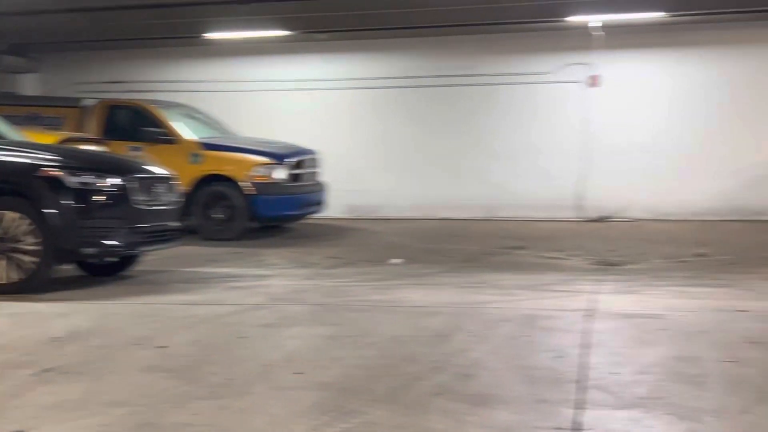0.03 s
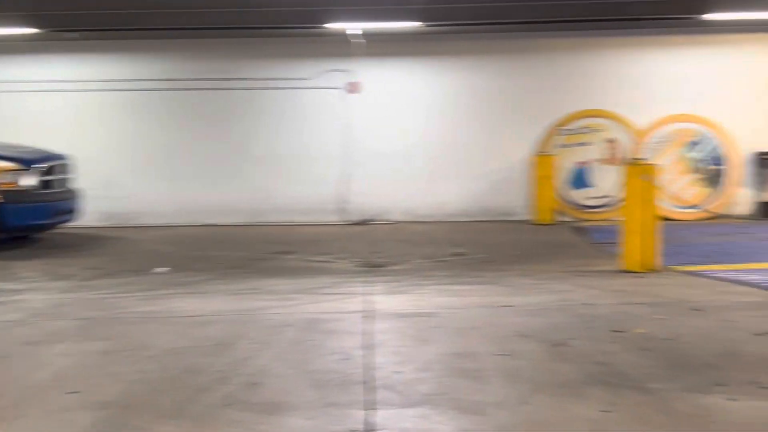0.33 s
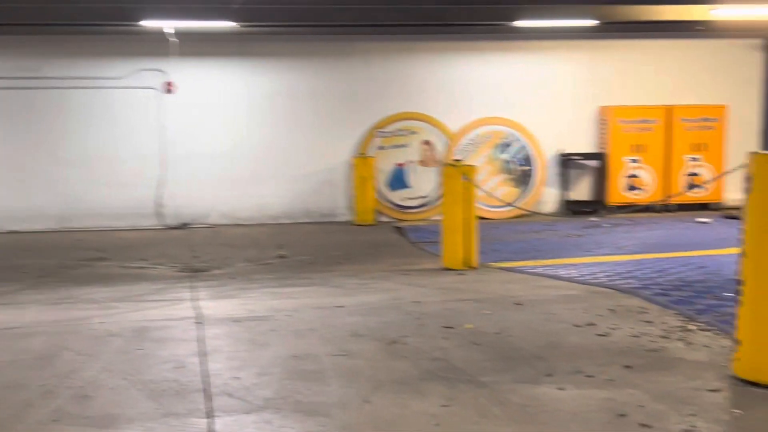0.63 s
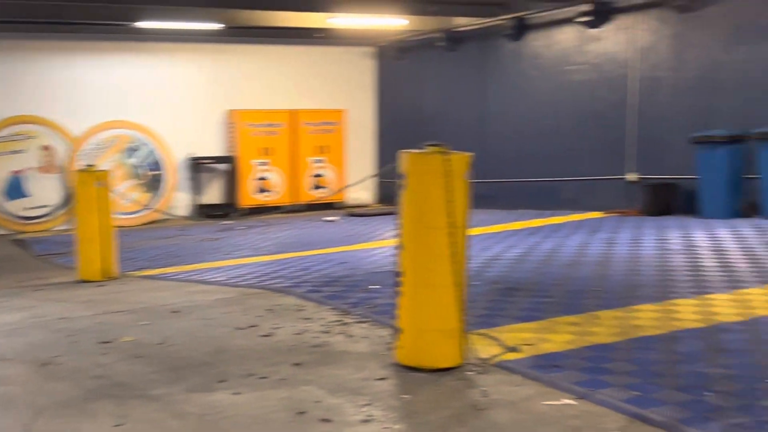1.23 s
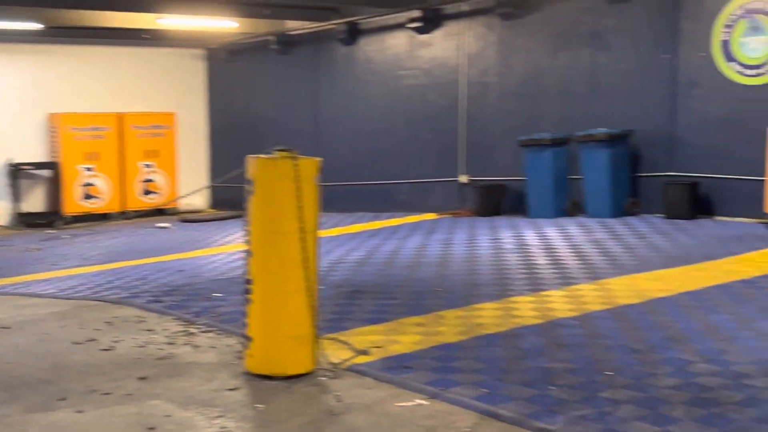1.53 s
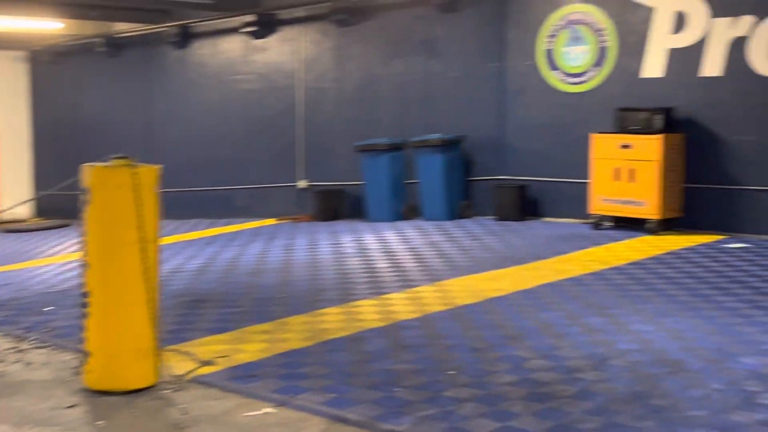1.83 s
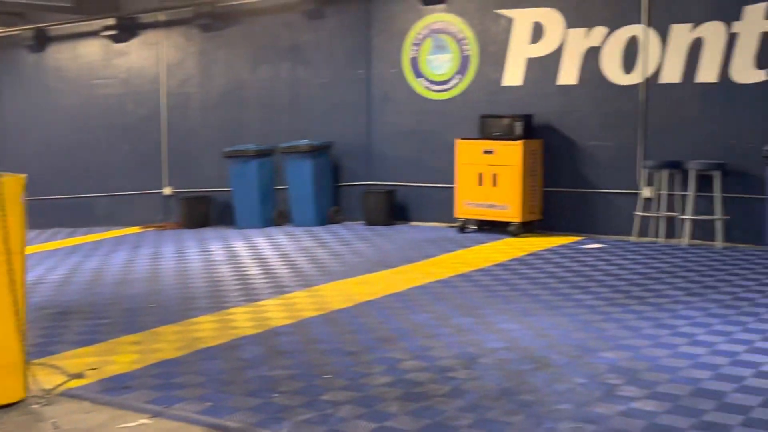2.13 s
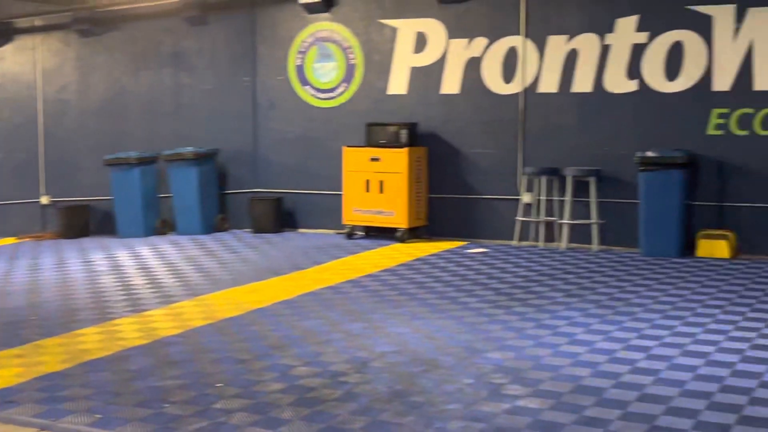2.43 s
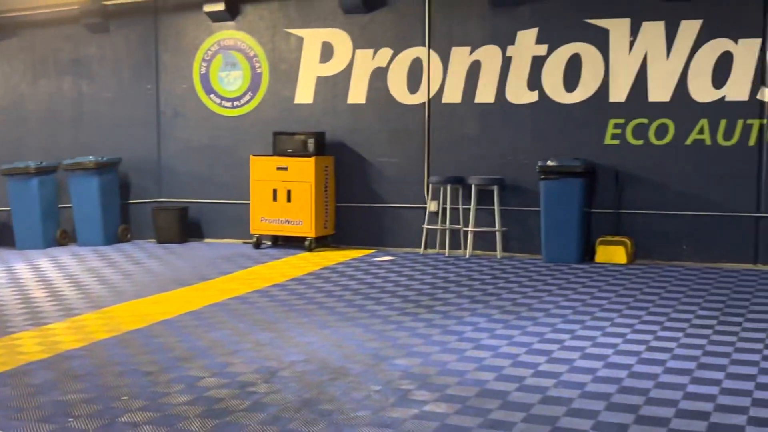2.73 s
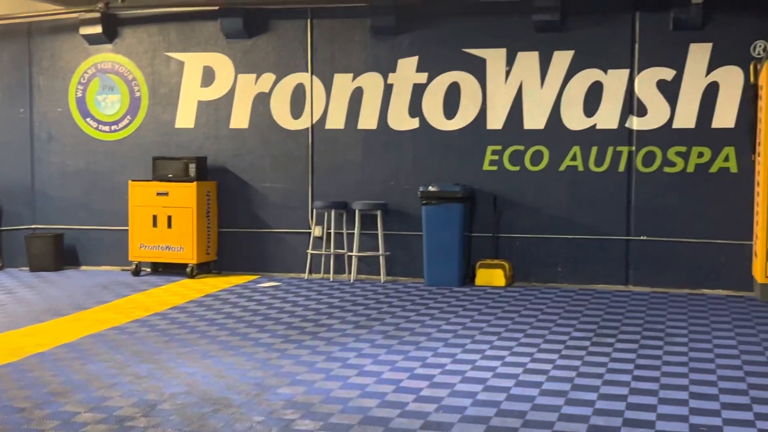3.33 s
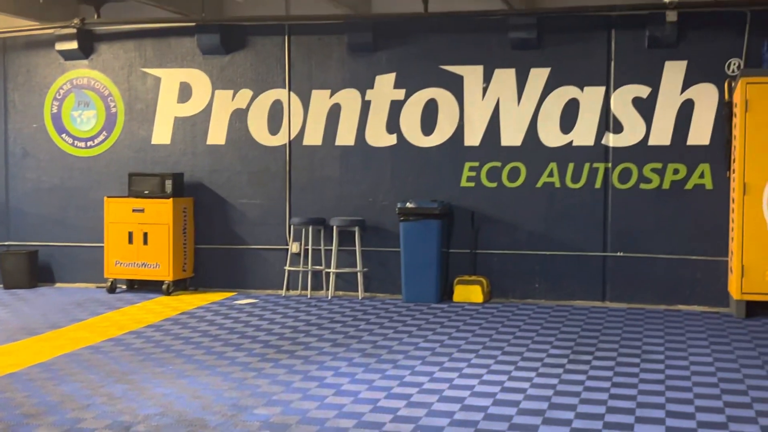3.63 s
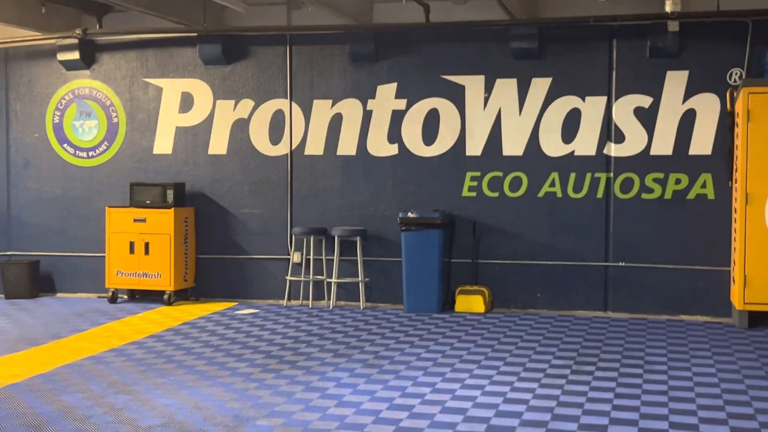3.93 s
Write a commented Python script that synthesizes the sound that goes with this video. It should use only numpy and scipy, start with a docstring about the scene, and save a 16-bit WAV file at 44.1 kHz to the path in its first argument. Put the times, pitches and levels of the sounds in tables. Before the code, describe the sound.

Far from the microphone, a car's starter cranks briefly, then the engine booms to life and settles into a hum. Before that, faint scuffs and cracking grit sound over the steady ventilation rumble and thin whine of a parking garage.

```python
"""First you hear ventilation rumbling in a concrete parking garage, and the faint, high whine of a fan drive.
A few soft scuffs hiss through the hall, and grit cracks on the floor. Then a car starts out of sight:
the starter rasps, the engine catches with a rolling boom and settles into a hum. It all sounds far away
and echoing. Rumbles, rasps and hisses are shaped noise; the whine, hum and low swells are sine tones."""
import sys
import numpy as np
from scipy import signal
from scipy.fft import rfft, irfft, next_fast_len
from scipy.io import wavfile
from scipy.ndimage import uniform_filter1d, map_coordinates

SR = 44100
rng = np.random.default_rng(int(sys.argv[2]) if len(sys.argv) > 2 else 0)


def inscribe(sig):
    """Save sig as 16-bit PCM at rate SR to the path in sys.argv[1].

    A 1-D sig is mono; a 2-D sig holds one channel per row.
    Samples are clipped to [-1, 1] before scaling.
    """
    pcm = np.round(np.clip(np.atleast_2d(sig).T, -1, 1) * 32767)
    wavfile.write(sys.argv[1], SR, pcm.astype(np.int16))


N = 176400  # 4 seconds

# The running engine. Each row: time in seconds, roar level in dB, exhaust boom level in dB.
ENGINE_LEVELS = [(2.88, -90, -70), (2.96, -46.5, -40), (3.02, -41, -30), (3.15, -41, -27.5),
                 (3.33, -41, -32.5), (3.55, -42.5, -32.5), (3.72, -42.5, -38), (3.85, -42.5, -36.5),
                 (4.0, -42, -35.5)]
# The engine's hum. Each row: time in seconds, level in dB.
HUM_LEVELS = [(3.3, -52), (3.39, -46), (3.45, -37), (3.51, -40), (3.56, -38), (3.605, -48), (3.66, -34.5),
              (3.72, -40), (3.77, -36), (3.85, -39), (3.91, -36), (4.0, -39.5)]
# The starter's gears. Each row: time in seconds, level in dB.
STARTER_LEVELS = [(2.12, -88), (2.18, -58), (2.205, -50), (2.25, -50.5), (2.31, -44.5), (2.42, -43.5),
                  (2.52, -45.5), (2.62, -47.5), (2.8, -45), (2.95, -44.5), (3.1, -56), (3.2, -48),
                  (3.4, -67)]
# Rasps as the starter gear meshes and is thrown out.
# Each row: peak time in seconds, half width in seconds, level in dB, treble tilt in dB per octave.
GEAR_RASPS = [(2.345, .075, -54, 0), (3.085, .09, -48.5, -4.5)]
# A brief low swell in the ventilation rumble, then low booms as the engine catches.
# Each row: peak time in seconds, half width in seconds, pitch in Hz, level in dB.
LOW_SWELLS = [(2.06, .05, 88, -35), (3.03, .035, 127, -31), (3.21, .06, 60, -31), (3.34, .035, 118, -34),
              (3.47, .07, 76, -37)]
# Scuffs. Each row: start in seconds, length in seconds, level in dB, treble tilt in dB per octave.
SCUFF_EVENTS = [(0.167, 0.022, -71.5, 5), (0.28, .08, -61, -3), (0.365, 0.1, -58.5, -.5),
                (0.526, 0.046, -65, -3.5), (.93, 0.068, -81, -4), (1.17, 0.12, -69, -2),
                (1.314, 0.06, -60, 2), (1.826, .025, -65.5, 1)]
# Cracking grit. Each row: start in seconds, level in dB.
GRIT_TICKS = [(.159, -63), (.384, -64), (1.232, -57), (1.311, -52), (1.323, -55.5), (1.844, -62),
              (2.159, -55), (2.187, -57)]
# The fan drive's tones. Each row: pitch in Hz, level in dB.
WHINE_TONES = [(1922, -74.5), (3477, -84), (5115, -86), (6001, -82), (6120, -82), (6240, -82),
               (6361, -81.5), (6481, -79.5)]
# Fan tones flaring up. Each row: peak time in seconds, half width in seconds, pitch in Hz, level in dB.
WHINE_FLARES = [(.17, .065, 6481, -72), (.57, .065, 6481, -71), (.84, .08, 6001, -77.5),
                (1.19, .1, 6481, -72.5), (1.17, .07, 6361, -75.5), (1.39, .065, 6361, -70.5),
                (1.37, .05, 6120, -78), (1.57, .05, 6481, -76.5), (1.82, .065, 6361, -69.5),
                (1.77, .05, 6120, -78), (2.09, .07, 6481, -76), (2.11, .07, 6120, -78)]

# A spectrum says how strong a noise is from low to high. Each row: frequency in Hz, relative level in dB.
ROAR_SPECTRUM = [(100, -18), (280, -4), (400, -3.5), (520, -2.5), (700, -4), (1000, -6), (1400, -11.5),
                 (1700, -11.5), (2000, -13), (2700, -16), (2980, -12.5), (3250, -18), (4500, -20),
                 (5500, -25), (6700, -23.5), (7700, -29), (9000, -32.5), (10000, -49), (11500, -33.5),
                 (15500, -45)]
EXHAUST_SPECTRUM = [(15, -37), (30, -36), (45, 1), (68, 4.5), (90, 0.5), (125, -5), (175, -4), (240, -16),
                    (400, -20.5), (900, -61), (2500, -86)]
THUMP_SPECTRUM = [(30, -20), (60, -2), (95, 2.5), (130, -5), (165, -2), (215, 2), (300, -23), (700, -40),
                  (2500, -83)]
STARTER_SPECTRUM = [(150, 0.5), (350, 0.5), (550, 1.5), (1000, -4.5), (1300, -3.5), (1600, -7),
                    (2400, -5.5), (3100, -9.5), (3550, -9.5), (4300, -12.5), (5100, -11), (6200, -15),
                    (7400, -20), (8800, -16.5), (10000, -29), (11700, -22), (13300, -30.5), (15500, -32)]
RASP_SPECTRUM = [(2000, -16), (3000, -3), (4200, 3), (5200, 3.5), (6500, -3), (8700, 0), (10000, -4),
                 (11700, -4), (13500, -5), (15500, -8)]
SCUFF_SPECTRUM = [(1000, -23), (2500, -0.5), (4500, 0.5), (7500, 2.5), (8800, 2), (10000, -8), (11700, 4),
                  (13500, -5), (15500, -2.5)]
TICK_SPECTRUM = [(2000, -15), (4500, 1), (8000, -7), (12000, -2), (15500, -3)]
VENT_SPECTRUM = [(15, -38), (28, -15.5), (42, -6), (58, 0.5), (80, -3), (103, -2.5), (135, -11),
                 (200, -17.5), (265, -16.5), (320, -23), (520, -25.5), (700, -27), (870, -23.5),
                 (1040, -26), (1190, -30.5), (1390, -27), (1560, -34.5), (2400, -37.5), (2650, -41.5),
                 (3600, -45.5), (4300, -50), (5600, -54), (7400, -55), (8800, -65), (10000, -68),
                 (11700, -63.5), (15500, -74)]

# Narrow resonances of the ducts and hall. Each row: frequency in Hz, share of their depth from 0 to 1.
RESONANCE_SHARE = [(400, 0.24), (1500, 0.45), (3500, 0.42), (7000, 0.98), (12000, 0.88)]
# How alike left and right sound. Each row: frequency in Hz, likeness (1 means the same).
STEREO_LIKENESS = [(60, .996), (130, .955), (280, .83), (450, .7), (650, .4), (1250, .42), (1600, .82),
                   (2000, .99), (2400, .9995), (2650, .995), (2950, .935), (3900, .955), (4600, .995),
                   (5400, .997), (6000, .98), (6400, .9995), (7450, .9995), (7800, .86), (9000, .8),
                   (9600, .998), (10600, .998), (11000, .82), (12300, .75), (12700, .998), (14200, .998),
                   (14600, .72), (15700, .65)]
# How far the left channel runs ahead of the right. Each row: frequency in Hz, phase in radians.
LEFT_LEAD = [(300, 0), (520, .2), (750, .8), (1150, .55), (1450, -.2), (2200, 0), (2600, 0), (3200, .25),
             (4500, .03), (7450, 0), (7750, -.6), (8600, -1), (9100, -2.6), (9600, -3.1), (10600, -3.2),
             (12300, -5.3), (12650, -6.25), (14300, -6.3), (14600, -7.3), (15700, -8.8)]

FIRING_HZ, FLUTTER_DEPTH = 70.3, 0.02
THUMP_START_S, THUMP_DB, THUMP_ATTACK_S, THUMP_FADE_S = 2.995, -31.5, 0.011, 0.74
SCUFF_ATTACK_S, SCUFF_FADE_S, GRIT_DEPTH_DB = 0.013, 0.49, 2.8
TICK_FADE_S, TICK_HALL_DB, TICK_HALL_FADE_S = 0.014, -20, 0.25
VENT_DB, WHINE_SWING_DB = -35.5, 3.5
RESONANCE_STEP_HZ, TILT_FROM_HZ, TOP_HZ = 29.7, 4000, 15720


def engine():
    """The engine roars with a flutter at its firing rate, hums at three times that, and the exhaust booms."""
    roar_gain, boom_gain = gains(ENGINE_LEVELS)
    hum_gain, = gains(HUM_LEVELS)
    flutter = 1 + FLUTTER_DEPTH * tone(FIRING_HZ, drift_hz=3.8, rate=19)
    roar = roar_gain * flutter * hall_noise(ROAR_SPECTRUM, patchy_db=0.32, resonance_db=2.3)
    boom = boom_gain * hall_noise(EXHAUST_SPECTRUM, patchy_db=0.86)
    hum = hum_gain * tone(3 * FIRING_HZ, drift_hz=1.56, rate=12)
    return roar + boom + hum


def ignition():
    """The first firing sends one low thump through the hall."""
    age = np.maximum(clock() - THUMP_START_S, 0)
    attack = 1 - np.exp(-age / THUMP_ATTACK_S)
    return amp(THUMP_DB) * attack * fade(age, THUMP_FADE_S) * hall_noise(THUMP_SPECTRUM, patchy_db=0)


def starter():
    """Gear noise rings in the starter's housing, with a bright rasp at either end of the cranking."""
    gear_gain, = gains(STARTER_LEVELS)
    gears = gear_gain * hall_noise(STARTER_SPECTRUM, patchy_db=0.5, resonance_db=3.0)
    hiss = hall_noise(RASP_SPECTRUM, patchy_db=1)
    rasps = sum(amp(db) * swell(peak, width) * tilted(hiss, tilt) for peak, width, db, tilt in GEAR_RASPS)
    return (gears + rasps) * amp(0.51 * wobble(rate=120))


def low_swells():
    """A brief low swell in the ventilation rumble, then low booms as the engine catches."""
    return swelling_tones(LOW_SWELLS)


def scuffs():
    """Short gritty rubs hiss, and the hall rings on after each one."""
    hiss = hall_noise(SCUFF_SPECTRUM, patchy_db=0.5)
    rubs = np.zeros((2, N))
    for start, length, db, tilt in SCUFF_EVENTS:
        age = np.maximum(clock() - start, 0)
        attack = 1 - np.exp(-age / SCUFF_ATTACK_S)
        ring = fade(np.maximum(age - length, 0), SCUFF_FADE_S)
        fresh_hiss = np.roll(hiss, rng.integers(N), axis=1)
        rubs += amp(db) * attack * ring * tilted(fresh_hiss, tilt)
    return rubs * unit(amp(GRIT_DEPTH_DB * wobble(rate=700)))


def grit_ticks():
    """Grit cracks on the concrete, and the hall answers faintly."""
    envelope = np.zeros(N)
    for start, db in GRIT_TICKS:
        age = np.maximum(clock() - start, 0)
        decay = fade(age, TICK_FADE_S) + amp(TICK_HALL_DB) * fade(age, TICK_HALL_FADE_S)
        envelope += (clock() >= start) * amp(db) * decay
    return envelope * hall_noise(TICK_SPECTRUM, patchy_db=-1)


def fan_whine():
    """Each fan drive tone fades and flares, as when you move through the hall's standing waves."""
    whine = np.zeros(N)
    for hz, db in WHINE_TONES:
        swing = amp(WHINE_SWING_DB * np.tanh(wobble(rate=6.9)))
        whine += amp(db) * unit(swing * tone(hz, drift_hz=4.06, rate=16))
    return whine + swelling_tones(WHINE_FLARES)


def ventilation():
    """Air rumbles steadily through the ducts."""
    gain = amp(VENT_DB + 0.1 * wobble(rate=2.3))
    return gain * hall_noise(VENT_SPECTRUM, patchy_db=0.23, resonance_db=2.5)


def hall_noise(spectrum, patchy_db, resonance_db=0):
    """Wide stereo noise at level 1, with random louder patches and narrow resonances that stay put."""
    cells = signal.stft(rng.standard_normal((2, N)), nperseg=512)[2]
    patches = uniform_filter1d(rng.standard_normal(cells.shape[1:]), size=4, axis=0)  # blur in frequency
    patches = uniform_filter1d(patches, size=24, axis=1)  # blur in time
    noise = signal.istft(cells * amp(patchy_db * unit(patches)), nperseg=512)[1][:, :N]
    bumps = rng.standard_normal(4096)

    def response(hz):
        ripple = map_coordinates(bumps, [hz / RESONANCE_STEP_HZ], mode="mirror")
        db = look_up(spectrum, hz) + resonance_db * look_up(RESONANCE_SHARE, hz) * ripple
        spread = np.arccos(np.clip(look_up(STEREO_LIKENESS, hz), -1, 1)) / 2
        return amp(db) * [np.cos(spread), np.sin(spread)]

    middle, side = filtered(noise, response)
    return unit(np.array([middle + side, middle - side]))


def swelling_tones(rows):
    """One tone for each row, rising and falling once in loudness."""
    return sum(amp(db) * swell(peak, width) * tone(hz, drift_hz=2.94, rate=15)
               for peak, width, hz, db in rows)


def tone(hz, drift_hz, rate):
    """A sine tone at level 1 whose pitch wanders slightly."""
    pitch = hz + drift_hz * wobble(rate)
    return unit(np.sin(2 * np.pi * np.cumsum(pitch) / SR))


def tilted(sound, tilt):
    """Turn the treble up or down by tilt dB per octave, then scale to level 1."""
    return unit(filtered(sound, lambda hz: amp(tilt * np.log2(np.maximum(hz / TILT_FROM_HZ, 1)))))


def filtered(sound, response):
    """Change the strength and phase of each frequency by response(hz)."""
    size = next_fast_len(N + SR // 2)
    hz = np.fft.rfftfreq(size, 1 / SR)
    return irfft(rfft(sound, size) * response(hz), size)[..., :N]


def swell(peak_s, width_s):
    """A smooth rise to 1 and back."""
    return np.exp(-0.5 * ((clock() - peak_s) / width_s) ** 2)


def fade(age, fade_s):
    """A gain that drops 60 dB every fade_s seconds."""
    return amp(-60 * age / fade_s)


def wobble(rate):
    """A smooth curve through rate random points a second."""
    return map_coordinates(rng.standard_normal(1024), [clock() * rate + 2], mode="mirror")


def gains(rows):
    """Turn each dB column into a gain over time, silent before the first row."""
    times, *columns = np.transpose(rows)
    return [amp(np.interp(clock(), times, db, left=-np.inf)) for db in columns]


def look_up(rows, hz):
    """Read between a table's rows on a logarithmic frequency scale."""
    row_hz, values = np.transpose(rows)
    return np.interp(np.log(hz + 1), np.log(row_hz + 1), values)


def amp(db):
    """Turn decibels into a gain."""
    return 10 ** (np.asarray(db) / 20)


def unit(sound):
    """Scale to an average (root mean square) level of 1."""
    return sound / np.sqrt(np.mean(sound ** 2) + 1e-20)


def clock():
    """The time of each sample in seconds."""
    return np.arange(N) / SR


def scene():
    """Add up all the sounds in the garage."""
    background = ventilation() + fan_whine() + scuffs() + grit_ticks()
    return background + starter() + ignition() + engine() + low_swells()


def record(dry):
    """Shift left and right apart in phase, and cut everything above TOP_HZ."""
    half_each_way = np.array([[0.5], [-0.5]])
    return filtered(dry, lambda hz: np.exp(1j * look_up(LEFT_LEAD, hz) * half_each_way) * (hz < TOP_HZ))


dry = scene()
out = record(dry)
inscribe(out)
```